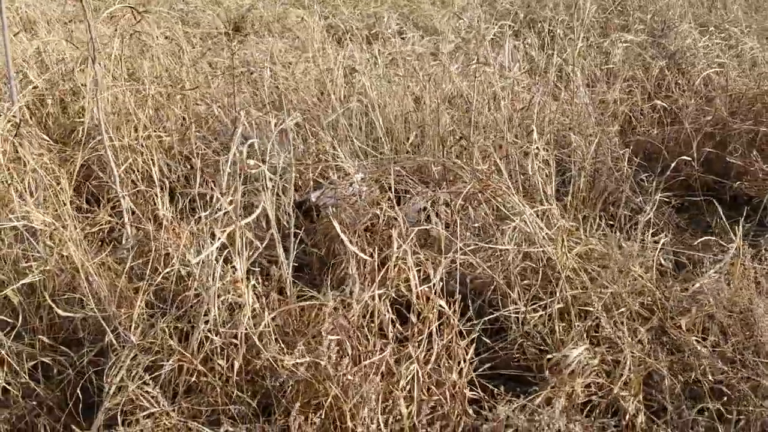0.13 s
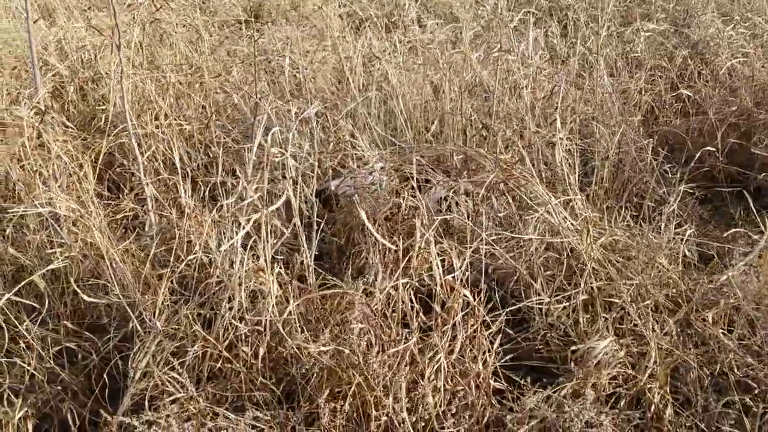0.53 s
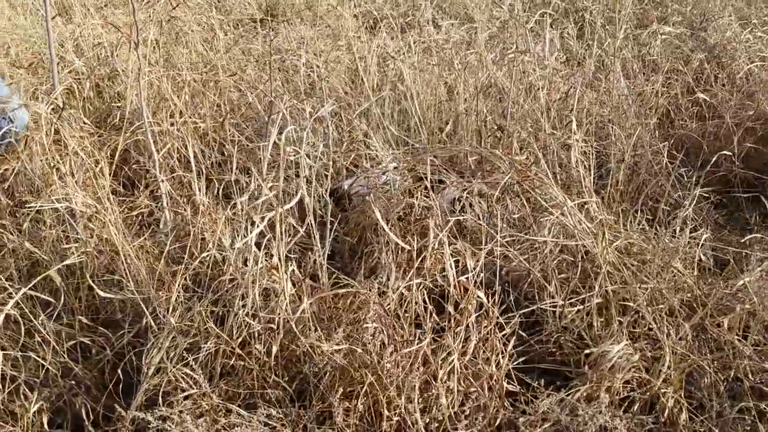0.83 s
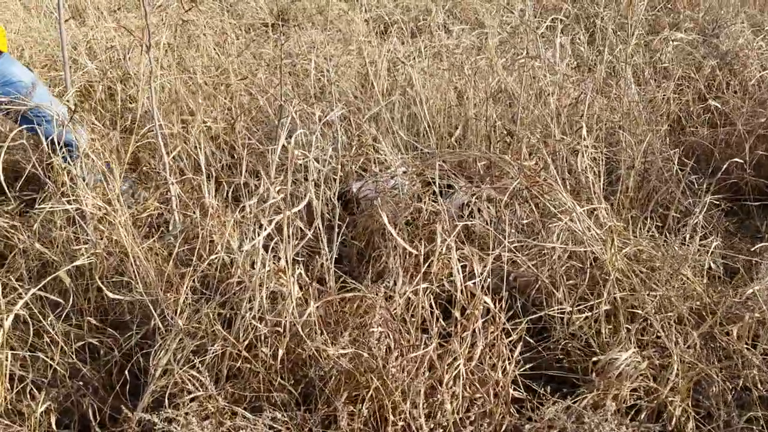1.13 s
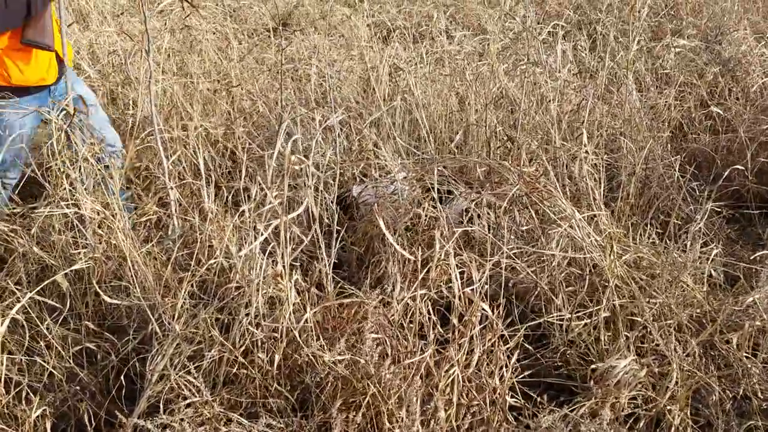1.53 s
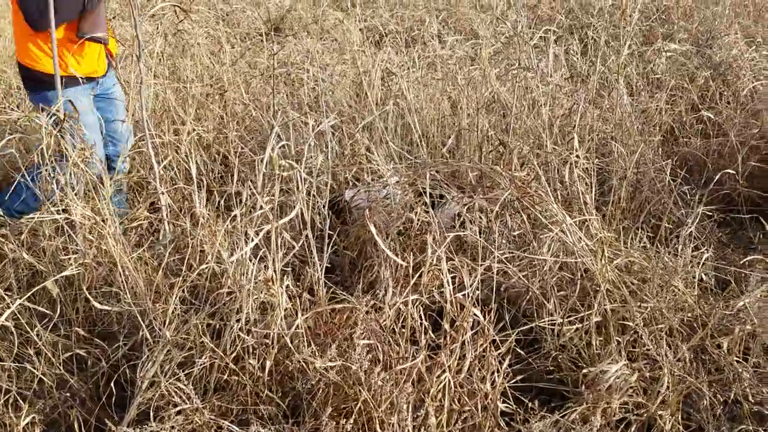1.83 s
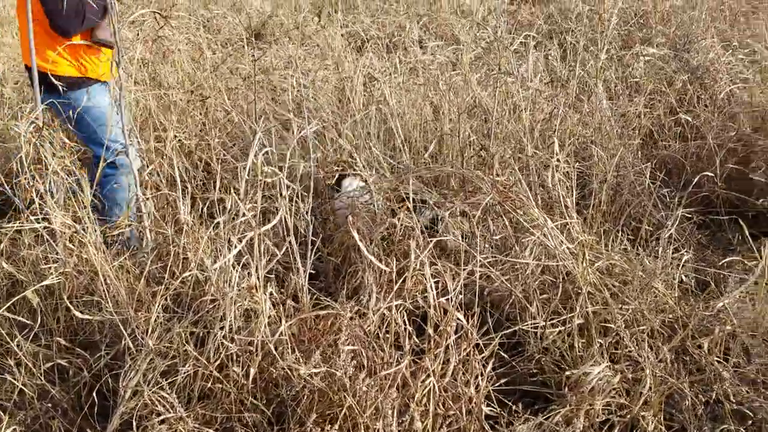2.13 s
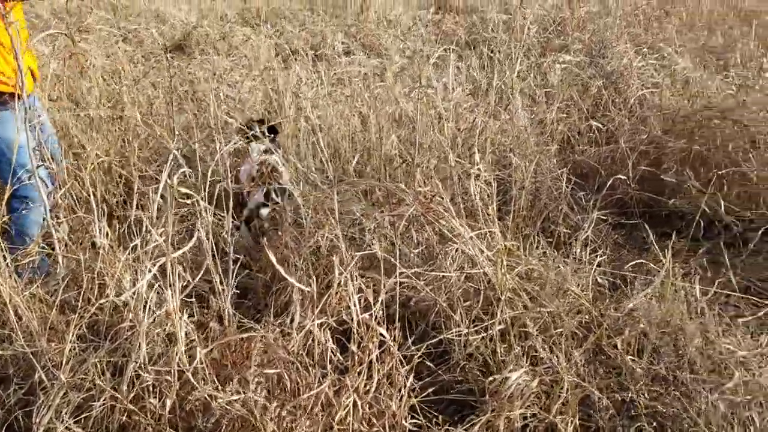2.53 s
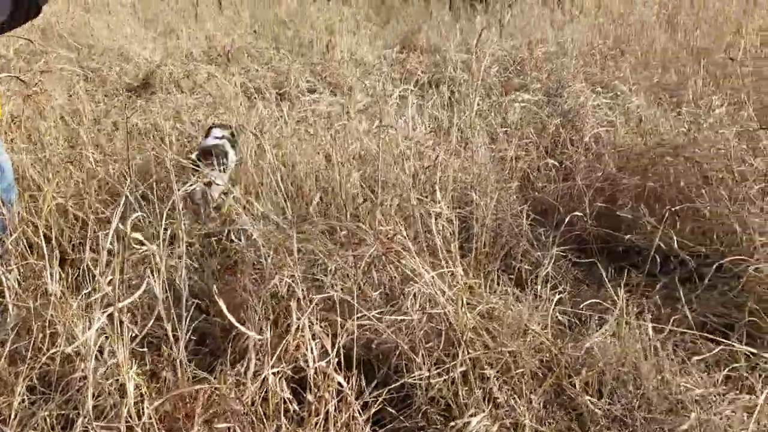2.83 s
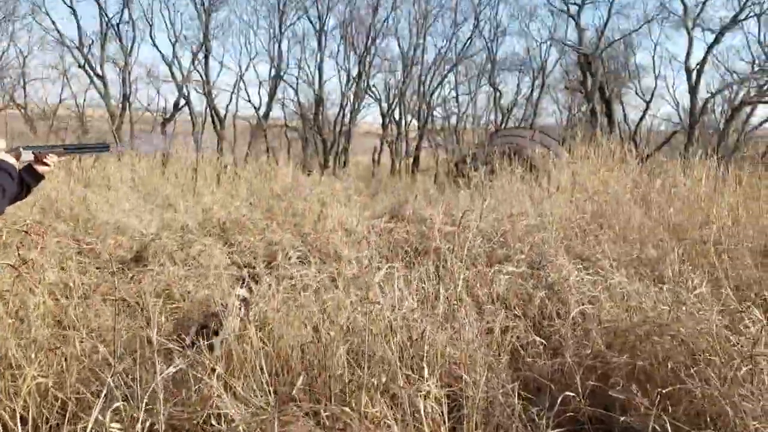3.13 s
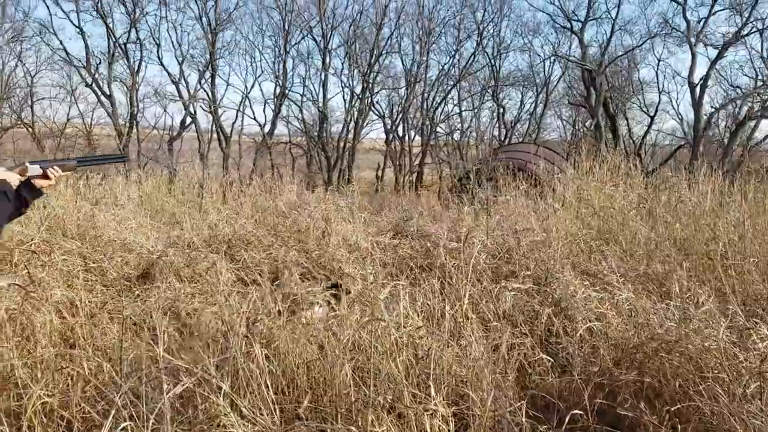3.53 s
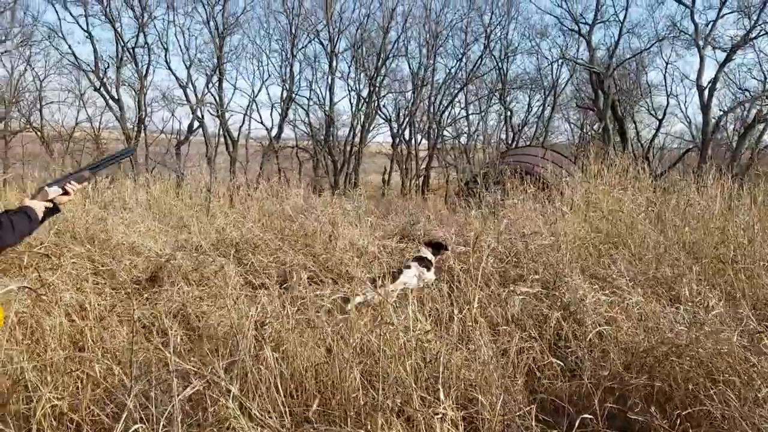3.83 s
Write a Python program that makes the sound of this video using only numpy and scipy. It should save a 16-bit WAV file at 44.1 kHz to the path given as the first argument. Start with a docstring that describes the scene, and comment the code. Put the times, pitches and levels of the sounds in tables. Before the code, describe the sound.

One loud, close shotgun blast in open dry grassland, preceded by rustling stalks, small stem snaps and the rapid wing whir of a flushing bird; brief echoes return from trees, captured by a hissy two-microphone camera.

```python
"""A shotgun fires close by in dry grassland: a pressure wave and a ringing crack of noise, then shaped
noise for the blast scattered by the grass and the echoes that a tree line throws back in clumps.
Before it, steps and wind rustle the grass (noise and tiny clicks), stems snap (ticks and short rings)
and a bird flushes with whirring wings (a clap per beat over a throbbing hum).
A two-microphone camera adds hiss on the left and ducks its gain after the shot."""
import sys
import numpy as np
from scipy import signal
from scipy.fft import rfft, irfft
from scipy.io import wavfile
from scipy.ndimage import uniform_filter1d

SR = 44100
rng = np.random.default_rng(int(sys.argv[2]) if len(sys.argv) > 2 else 0)


def log_audio(samples):
    """Write samples as a 16-bit WAV file to the path given in sys.argv[1]."""
    # one column per channel
    frames = np.atleast_2d(samples).T
    # limit to full scale, then quantise
    limited = np.clip(frames, -1, 1)
    pcm = np.round(limited * 32767).astype(np.int16)
    wavfile.write(sys.argv[1], SR, pcm)


N = 176400  # samples, 4 s
SHOT_S = 3.2475

# Loudness of the grass rustle up to the shot and after it, before each layer's boost:
# time_s, level_db, mids_level_db
RUSTLE_BEFORE = [(0.0, -47, -63), (0.05, -47.5, -60), (0.12, -52, -63), (0.37, -48, -60.5),
                 (0.38, -58, -63.5), (0.47, -54, -59.5), (0.64, -58.5, -61), (0.64, -54.5, -63),
                 (0.73, -52.5, -62.5), (0.73, -46, -61), (0.75, -54, -64.5), (0.83, -51.5, -62.5),
                 (0.9, -58, -68), (1.02, -46, -59.5), (1.16, -47.5, -59), (1.28, -52, -62), (1.3, -59, -63),
                 (1.5, -53, -62), (1.61, -61, -66), (1.77, -57.5, -64), (1.95, -54, -66.5),
                 (2.0, -48.5, -57), (2.14, -49.5, -56.5), (2.26, -46, -58), (2.28, -50.5, -59.5),
                 (2.46, -46.5, -58), (2.51, -53, -53.5), (2.56, -45, -58), (2.73, -56.5, -65),
                 (2.82, -52, -64.5), (2.96, -58.5, -65.5), (3.02, -50.5, -63.5), (3.14, -60.5, -64),
                 (3.22, -49, -58)]
RUSTLE_AFTER = [(3.3, -51, -52), (3.6, -54, -58), (3.8, -58.5, -55.5), (4.0, -59, -62)]
RUSTLE_ROWS = RUSTLE_BEFORE + RUSTLE_AFTER


def gain_of(db):
    """Turns decibels into a factor for the wave."""
    return 10 ** (np.asarray(db) / 20)


def evened(x):
    """Scales a signal to an effective (rms) size of 1."""
    return x / np.sqrt(np.mean(x ** 2) + 1e-20)


def read(points, hz):
    """Reads a curve of (pitch_hz, value) between its points, with pitch on a log scale."""
    f, value = np.transpose(points)
    return np.interp(np.log(hz + 1), np.log(f + 1), value)


def level(rows, axis=1):
    """Gain along the scene from a column of dB, as good as silent before the first row."""
    rows = np.array(rows, float)
    return gain_of(np.interp(np.arange(N) / SR, rows[:, 0], rows[:, axis], left=-150))


def level_from_shot(rows):
    """Gain that holds the first row's level from the moment of the shot."""
    return level([(SHOT_S, rows[0][1])] + rows)


def until_last(rows):
    """1 up to the time of the last row, 0 after it."""
    return np.arange(N) < rows[-1][0] * SR


def add(mix, s, sound, lag=0, right_db=0):
    """Adds a sound to both sides at s seconds; the left comes lag samples later."""
    for side, (at, db) in enumerate([(round(s * SR) + lag, 0), (round(s * SR), right_db)]):
        part = mix[side, at:][:len(sound)]
        part += gain_of(db) * sound[:len(part)]


def field(colour, same, lag, patchy_db, flicker_db, size=256, loss=None):
    """Two-channel noise with random patches and wide flicker; left lags by lag samples.

    same is the likeness of the sides (0 to 1); loss lists (pitch_hz, db_lost_per_s) after the shot."""
    frames = 4 * N // size + 8
    hz = np.fft.rfftfreq(size, 1 / SR)[:, None]
    a, b, c, d, patches = rng.standard_normal((frames, len(hz), 5)).T
    patches = uniform_filter1d(patches, size=5, axis=0)
    patches = evened(uniform_filter1d(patches, size=24, axis=1))
    flicker = evened(uniform_filter1d(rng.exponential(1, frames) - 1, size=3))
    same = np.clip(same, 0, 1)
    shared, own = a + 1j * b, c + 1j * d
    left = shared * np.exp(-2j * np.pi * hz * lag / SR)
    right = same * shared + np.sqrt(1 - same ** 2) * own
    z = np.array([left, right])
    z = z * gain_of(read(colour, hz) + patchy_db * patches + flicker_db * flicker)
    norm = np.std(signal.istft(z, nperseg=size, noverlap=3 * size // 4)[1])
    if loss:
        since_shot = np.maximum(np.arange(frames) * size / 4 / SR - SHOT_S, 0)
        z = z * gain_of(-read(loss, hz) * since_shot)
    return signal.istft(z / norm, nperseg=size, noverlap=3 * size // 4)[1][:, :N]


def burst(hz, half_s, glide):
    """A few cycles under a bell, sliding in pitch."""
    t = np.arange(-3 * half_s, 3 * half_s, 1 / SR)
    bell = np.exp(-.5 * (t / half_s) ** 2)
    return bell * np.sin(2 * np.pi * hz * (t + glide * t ** 2 / (2 * half_s)))


def grass():
    """Dry stalks hiss: one noise layer for the treble and one for the mids."""
    # Relative strength of each pitch: pitch_hz, density_db_per_hz
    treble_colour = [(1000, -28), (1700, -21), (1870, -9.5), (2150, 0), (2850, -1.5), (4070, -1),
                     (7480, -2), (9290, 0), (12100, -16.5), (15000, 3.5), (16000, -7)]
    mids_colour = [(76, -47), (130, -12.5), (286, -4), (326, -0.5), (367, -8), (537, -2.5), (756, -1),
                   (1730, -2.5), (2280, -7.5), (3000, -7.5), (3900, -23), (6600, -120)]
    treble = field(treble_colour, 0.36, -21, patchy_db=1.0, flicker_db=1.18, size=512)
    mids = field(mids_colour, 0.56, -10, patchy_db=1.25, flicker_db=1.37, size=512)
    return gain_of(7.5) * level(RUSTLE_ROWS) * treble + gain_of(9) * level(RUSTLE_ROWS, axis=2) * mids


def wind():
    """Wind rumbles as steady low noise with random patches."""
    # Relative strength of each pitch: pitch_hz, density_db_per_hz
    wind_colour = [(12, -32), (20, 1), (27, -8), (50, -2.5), (76, 2), (96, -3.5), (135, -17), (250, -15),
                   (320, -38), (550, -120)]
    return gain_of(-62) * field(wind_colour, 0.7, -10, patchy_db=3, flicker_db=-1.0, size=2048)


def crackle():
    """Many tiny stalk clicks: short fading noise at random times, louder where the rustle is loud."""
    clicks_per_s, spread_db = 400, 4.5
    happens = rng.random(N) < clicks_per_s / SR
    size = gain_of(spread_db * np.minimum(rng.exponential(1, N), 2.6)) * happens
    kind = rng.integers(0, 8, N)
    t = np.arange(200) / SR
    out = np.zeros(N + 20)
    for k, tick in enumerate(rng.standard_normal((8, 200))):
        out[:N] += signal.oaconvolve(size * (kind == k), tick * np.exp(-t / .0007))[:N]
    sides = np.array([out[:N], np.roll(out, 20)[:N]])  # the right comes 20 samples later
    return gain_of(1.5) * level(RUSTLE_ROWS) * sides


def snaps():
    """Each snapping stem gives a wide crackling tick and a short noisy ring."""
    # One row per snap: start_s, ring_db (before the trim below), pitch_hz, tick_db, length_s (sets the fade)
    snap_rows = [(.189, -36, 5900, -37, .002), (0.2207, -23.5, 1130, -44, 0.0035),
                 (.36, -30, 596, -44, 0.0025), (0.364, -31, 3920, -51, .003),
                 (.4915, -28.5, 6360, -30, 0.0025), (0.533, -36, 2270, -40, .002),
                 (0.646, -36, 3920, -28.5, 0.0029), (.7312, -28.5, 4040, -34, 0.003),
                 (0.81, -36, 3900, -35, .004), (1.073, -32, 915, -46, 0.0042),
                 (1.379, -42, 5030, -42, 0.0036), (1.556, -38, 5190, -33, .002),
                 (1.7759, -45, 3650, -42, .002), (1.8084, -47, 5190, -28.5, 0.0032),
                 (2.12, -27, 4260, -26, 0.0023)]
    out, t = np.zeros((2, N)), np.arange(900) / SR
    noises = rng.standard_normal((len(snap_rows), 2, 900))
    for (s, ring_db, hz, tick_db, length), noise in zip(snap_rows, noises):
        fade = np.exp(-t / max(length, 1e-4) * 1.4)
        wobble = 0.33 * evened(uniform_filter1d(noise[0], size=30))
        ring = gain_of(ring_db - 1.5) * np.sin(2 * np.pi * hz * t + wobble)
        tick = gain_of(tick_db) * np.diff(noise[1], prepend=0)  # differences brighten the noise
        add(out, s, fade * (ring + tick), lag=-18)
    return out


def wing_claps():
    """Each wing beat is a short hollow clap: a few cycles of a gliding tone."""
    # One row per clap: time_s, peak_db (before the boost below), pitch_hz
    beat_rows = [(1.949, -46.5, 805), (2.003, -43.5, 855), (2.034, -38.5, 676), (2.065, -39.5, 695),
                 (2.107, -37.5, 950), (2.15, -32.5, 905), (2.192, -31, 880), (2.234, -37.5, 820),
                 (2.274, -37, 865), (2.314, -36, 800), (2.356, -44, 795), (2.398, -39, 805),
                 (2.44, -37, 785), (2.482, -43, 776), (2.522, -39, 840), (2.564, -39, 855),
                 (2.606, -39, 945), (2.647, -41.5, 1000), (2.69, -61, 958), (2.731, -45, 1020),
                 (2.772, -46, 830), (2.814, -46, 977), (2.861, -53, 1280)]
    clap_s = .0012
    out = np.zeros((2, N))
    for s, db, hz in beat_rows:
        add(out, s - 2 * clap_s, gain_of(db + 2.5) * burst(hz, clap_s, glide=-0.051), lag=-6)
    return out


def wing_air():
    """Air pushed by the wings hums at multiples of the beat, and a flutter of noise throbs with it."""
    # Loudness shared by hum and flutter: time_s, level_db
    hum_rows = [(1.9, -67), (2.1, -52.5), (2.412, -57), (2.428, -58.5), (2.698, -59.5), (2.73, -68),
                (2.784, -58.5), (2.868, -74), (2.9, -59)]
    # Tones of the hum: multiple of the beat rate, relative_level_db
    orders = [(2, -3), (3, 2.5), (4, -7.5), (5, -4), (6, -17.5)]
    # Feathers through the air, relative strength of each pitch: pitch_hz, density_db_per_hz
    flutter_colour = [(88, -35), (150, -12), (216, -20), (255, -1), (409, -13.5), (674, -5.5), (1500, -3),
                      (1950, -33), (3300, -120)]
    beat_hz, flutter_depth = 25.2, 0.64
    t = np.arange(N) / SR
    turn = 2 * np.pi * beat_hz * (t - 2.15)
    wobble = 0.64 * evened(uniform_filter1d(rng.standard_normal((len(orders), N)), size=3000))
    hum = sum(gain_of(db) * np.cos(k * turn + w) for (k, db), w in zip(orders, wobble))
    throb = 1 + flutter_depth * np.cos(turn)
    air = throb * field(flutter_colour, 1.0, -1.5, patchy_db=3, flicker_db=-1, size=512)
    return level(hum_rows) * until_last(hum_rows) * (evened(hum) + air)


def pressure_wave():
    """The blast: one sharp swing of pressure that crosses zero once and dies away."""
    blast_s, blast_db = 0.00042, 9.5  # time to the zero crossing; gain
    out, u = np.zeros((2, N)), np.arange(400) / SR / blast_s
    add(out, SHOT_S, -gain_of(blast_db) * np.minimum(u * 4, 1) * (1 - u) * np.exp(-u), right_db=-10)
    return out


def crack():
    """Ringing overload of each microphone: a band of noise, flattened at its peaks."""
    # One row per microphone: side (whole part; 0 left, 1 right), length_s, level_db
    crack_rows = [(0, 0.0095, 1.5), (1.004, 0.00494, 8)]
    centre_hz, width_hz = 1530, 900
    out, t, at = np.zeros((2, N)), np.arange(600) / SR, round(SHOT_S * SR)
    band = signal.butter(1, [centre_hz - width_hz / 2, centre_hz + width_hz / 2], "band", fs=SR)
    for (side, length, db), noise in zip(crack_rows, rng.standard_normal((2, 1200))):
        ring = np.tanh(1.1 * evened(signal.lfilter(*band, noise)[600:]))
        shape = np.clip((length - t) / 0.00067, 0, 1) * np.minimum(t / 0.0015, 1)
        out[int(side), at:at + 600] += gain_of(db) * ring * shape
    return out


def grass_scatter():
    """The grass scatters the blast as noise, with a separate layer for the treble."""
    # Loudness of the main and treble layers, before the boosts below: time_s, level_db
    near_rows = [(3.25, -18), (3.274, -17), (3.324, -18), (3.334, -20.5), (3.346, -18.5), (3.422, -25.5),
                 (3.44, -35), (3.7, -55), (3.784, -65), (4.0, -81)]
    bright_rows = [(3.25, -24), (3.278, -23), (3.334, -34.5), (3.348, -31.5), (3.514, -58), (3.564, -60),
                   (3.6, -60)]
    # Relative strength of each pitch in the two layers: pitch_hz, density_db_per_hz
    near_colour = [(210, -42), (350, -10.5), (450, -8), (647, -4.5), (896, -2.5), (1110, -7), (1410, -6.5),
                   (2050, -3), (2440, -9), (4810, -13), (5730, -15.5), (7000, -18.5), (9100, -50),
                   (15400, -120)]
    bright_colour = [(3820, -42), (6500, -9), (8620, -7.5), (9950, -14), (13500, -6.5), (15100, -8),
                     (16000, -4)]
    # Extra fading in the air (negative = the pitch gains): pitch_hz, loss_db_per_s
    air_loss = [(1000, 10), (2500, -9.5), (4000, 3), (7000, 49)]
    near = field(near_colour, 0.17, -19.5, patchy_db=1, flicker_db=1.5, size=128, loss=air_loss)
    bright = field(bright_colour, 0.16, -19.5, patchy_db=3.5, flicker_db=-2.5, size=128)
    bright_gain = gain_of(14) * level_from_shot(bright_rows) * until_last(bright_rows)
    return gain_of(10.5) * level_from_shot(near_rows) * near + bright_gain * bright


def boom():
    """The low roll of the shot: deep noise, nearly alike on both sides."""
    # Loudness before the boost below: time_s, level_db
    boom_rows = [(3.25, -29), (3.328, -28.5), (3.342, -53), (3.4, -40), (3.434, -63), (3.462, -44),
                 (3.572, -59), (3.592, -66), (3.7, -69)]
    # Relative strength of each pitch: pitch_hz, density_db_per_hz
    boom_colour = [(40, -38), (80, -28), (115, -2), (150, -1.5), (200, -17), (250, -2.5), (320, 3),
                   (400, -18), (520, -36), (880, -120)]
    roll = field(boom_colour, 0.91, 8, patchy_db=-3, flicker_db=3, size=2048)
    return gain_of(8) * level_from_shot(boom_rows) * until_last(boom_rows) * roll


def tree_echoes():
    """The tree line throws back dull noise in clumps, with single echoes as short gliding tones."""
    # Loudness of the noise, before the boost below: time_s, level_db
    tree_rows = [(3.3, -34), (3.332, -20), (3.336, -19.5), (3.38, -13), (3.426, -21.5), (3.436, -33.5),
                 (3.458, -26.5), (3.474, -33.5), (3.572, -37.5), (3.59, -44.5), (3.794, -52.5),
                 (3.896, -68), (3.974, -70), (3.986, -53), (4.0, -65)]
    # Relative strength of each pitch: pitch_hz, density_db_per_hz
    tree_colour = [(120, -46.5), (220, -52), (320, -10.5), (600, 1), (900, -3), (1250, -5.5), (1450, -11),
                   (2300, -20), (3500, -21), (6600, -100)]
    # One row per single echo: time_s, peak_db (before the boost below), pitch_hz
    trunk_rows = [(3.337, -17, 700), (3.368, -9, 610), (3.38, -5, 716), (3.393, -8, 570), (3.422, -30, 610),
                  (3.455, -20.5, 625), (3.518, -30, 660), (3.54, -27.5, 630), (3.558, -26.5, 1020),
                  (3.674, -48, 773), (3.763, -40.5, 880)]
    rise = [(tree_rows[0][0] - .02, -50)]  # fades in over 20 ms
    clumps = field(tree_colour, 0.44, -1.2, patchy_db=1.05, flicker_db=2, size=384)
    out = gain_of(9) * level(rise + tree_rows) * clumps
    for s, db, hz in trunk_rows:
        add(out, s - .003, gain_of(db + 7.5) * burst(hz, 0.001334, glide=-0.055), lag=-2)
    return out


def shot():
    """All parts of the shot together, with the pitches below 81 Hz weakened."""
    out = pressure_wave() + crack() + grass_scatter() + boom() + tree_echoes()
    return signal.sosfilt(signal.butter(3, 81, "high", fs=SR, output="sos"), out)


def scene():
    """Everything that sounds in the grassland."""
    return grass() + wind() + crackle() + snaps() + wing_claps() + wing_air() + shot()


def microphone_hiss():
    """Steady noise of the left microphone, whose level dips briefly."""
    # Loudness before the boost below: time_s, level_db
    hiss_rows = [(0.0, -52), (0.36, -52), (0.48, -53), (0.82, -51.5), (1.38, -52.5), (1.54, -56),
                 (1.84, -54), (2.0, -52), (2.94, -51.5), (3.25, -52), (3.4, -55), (3.53, -51.5),
                 (3.68, -52), (4.0, -57.5)]
    # Relative strength of each pitch: pitch_hz, density_db_per_hz
    hiss_colour = [(1500, -51), (2000, -15), (2300, -13), (2600, -32), (4000, -12), (6000, -13),
                   (8000, -14), (9500, -1.5), (11000, -0.5), (13000, 1.5), (16000, -3.5)]
    # Brief bell-shaped dips: middle_s, width_s (one standard deviation), change_db
    dip_rows = [(1.12, 0.01, -19), (2.445, 0.013, -18.5)]
    t = np.arange(N) / SR
    dips = sum(db * np.exp(-.5 * ((t - s) / w) ** 2) for s, w, db in dip_rows)
    noise = field(hiss_colour, 0, 0, patchy_db=-0.5, flicker_db=.5, size=512)[0]
    return gain_of(11 + dips) * level(hiss_rows) * noise


def right_microphone(x):
    """The right microphone has its own tone colour."""
    # How it changes each pitch: pitch_hz, gain_db
    right_colour = [(60, -1.5), (300, -2), (1500, -2.5), (3000, -3), (5000, 2), (7000, -4.5), (8500, -24.5),
                    (11500, -9.5), (13500, -3.5), (15500, 3)]
    hz = np.fft.rfftfreq(N, 1 / SR)
    return irfft(rfft(x) * gain_of(read(right_colour, hz)), N)


def gain_control(x):
    """Turns both sides down fast when the sound is loud, and barely recovers."""
    over_limit_db, share, recover_db_per_s = -25, 0.27, .5  # recovery is of the tracked peak
    power_db = 10 * np.log10(abs(uniform_filter1d((x ** 2).mean(0), size=90)) + 1e-12)
    fall = np.arange(N) / SR * recover_db_per_s
    peak_db = np.maximum.accumulate(power_db + fall) - fall
    over_db = np.maximum(peak_db - over_limit_db, 0)
    return x / gain_of(share * uniform_filter1d(over_db, size=40))


def top_cut(x):
    """Nothing passes above the cut-off."""
    return signal.sosfilt(signal.butter(12, 16800, fs=SR, output="sos"), x)


def record(dry):
    """The camera: microphone hiss and colour, gain control, soft limiting of peaks, treble limit."""
    x = np.array([dry[0] + microphone_hiss(), right_microphone(dry[1])])
    x = np.tanh(gain_control(x))
    low_pass = signal.firwin(1023, 15850, window=("kaiser", 9), fs=SR)  # edge in Hz
    x = signal.oaconvolve(x, low_pass[None], "same")
    return top_cut(x)


dry = scene()
out = record(dry)
log_audio(out)
```